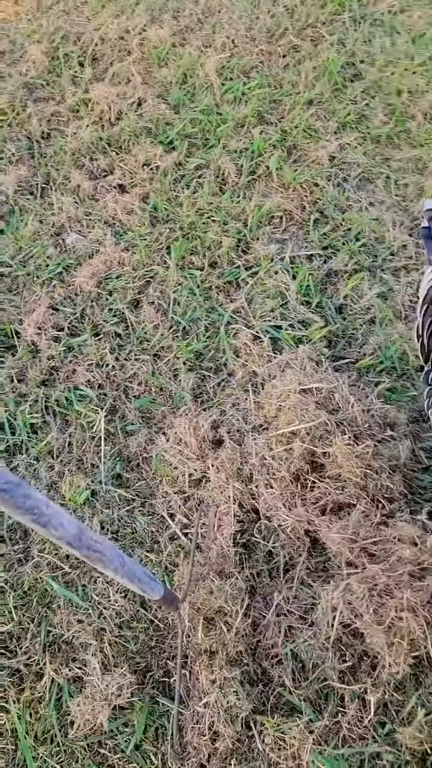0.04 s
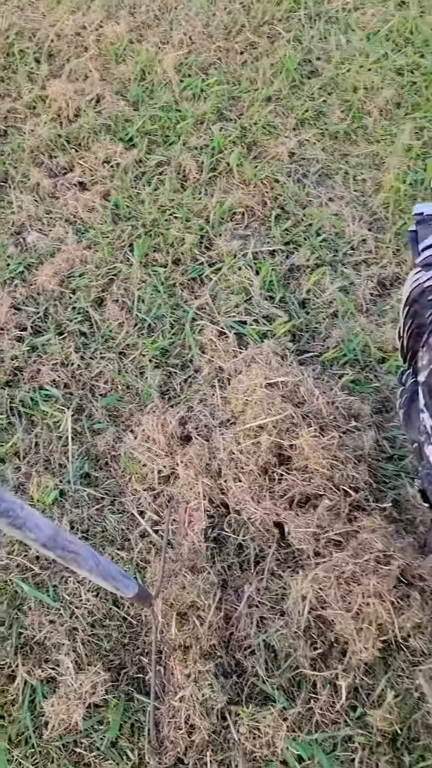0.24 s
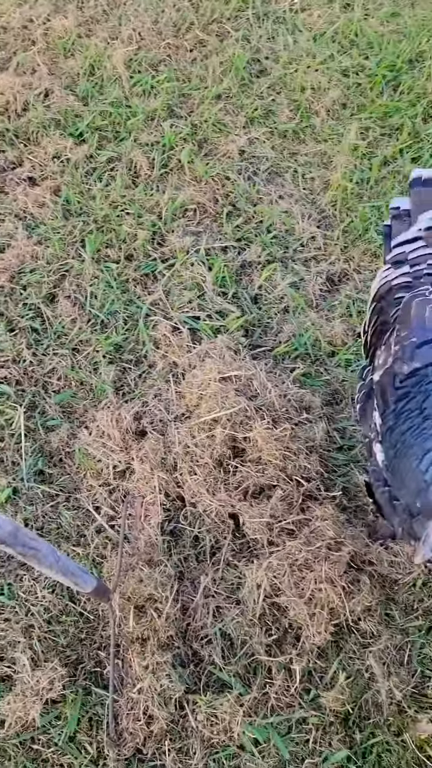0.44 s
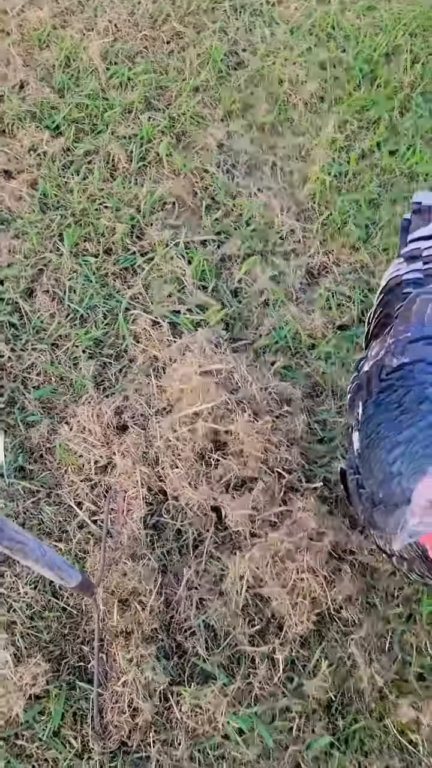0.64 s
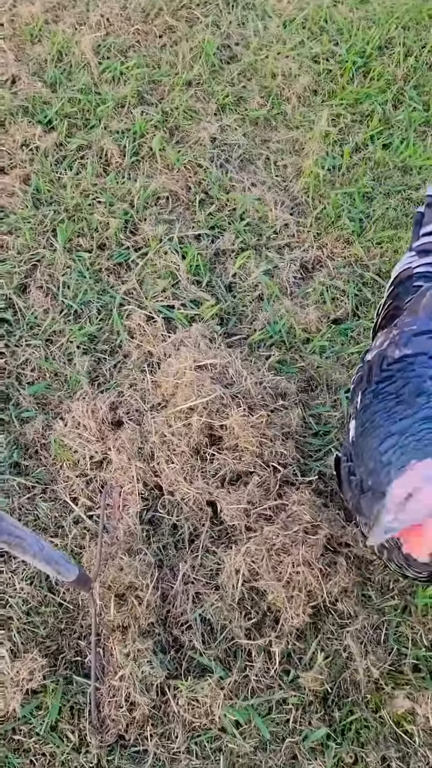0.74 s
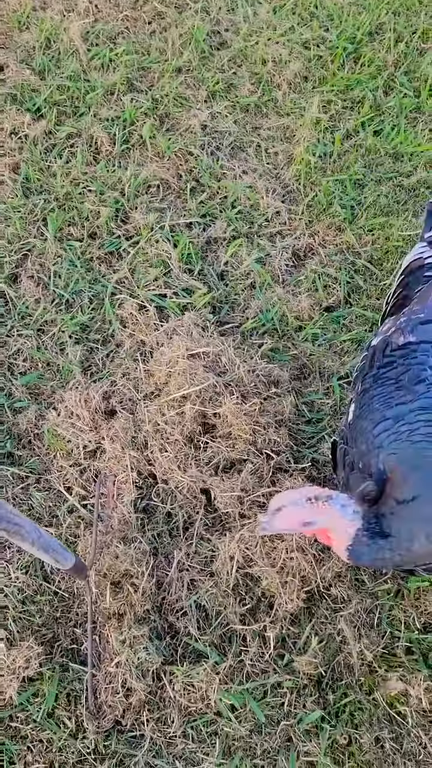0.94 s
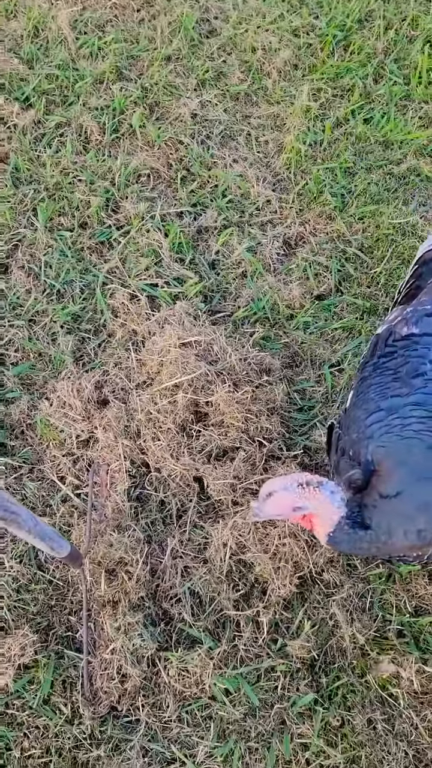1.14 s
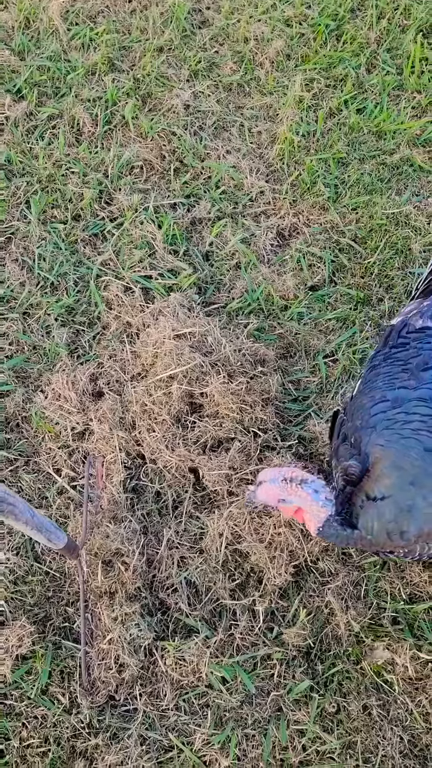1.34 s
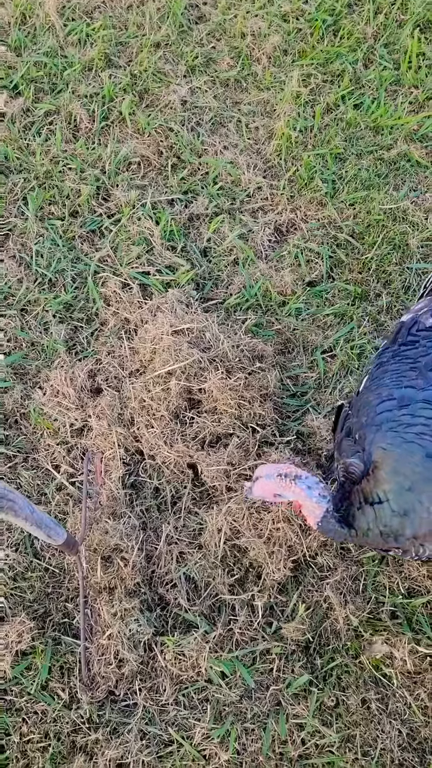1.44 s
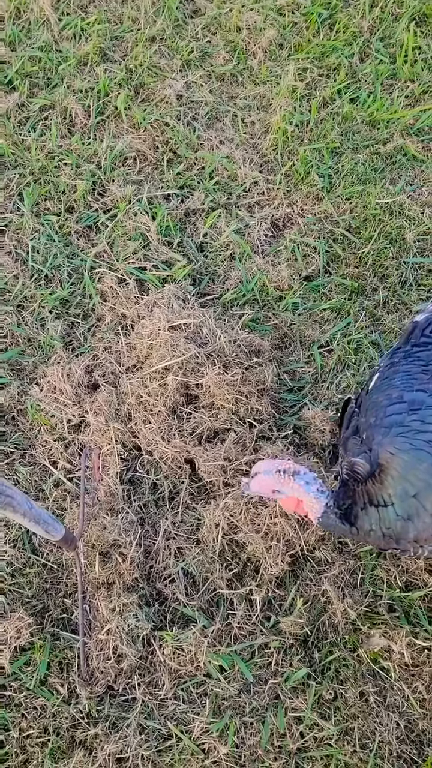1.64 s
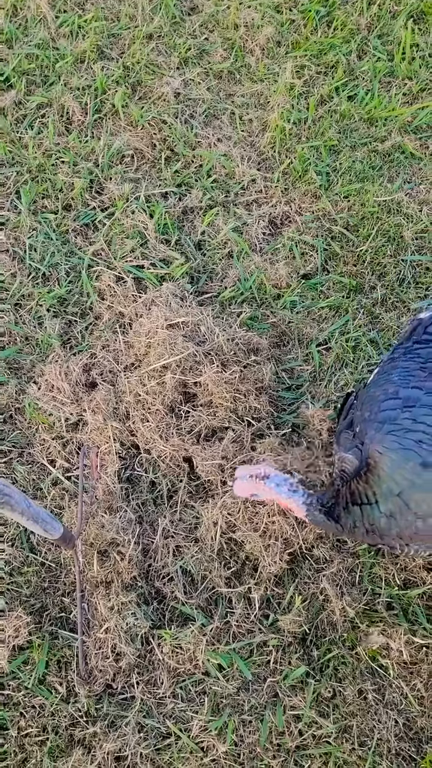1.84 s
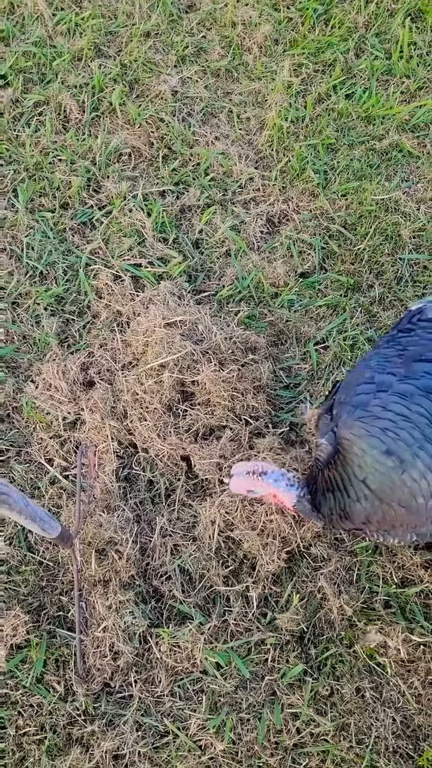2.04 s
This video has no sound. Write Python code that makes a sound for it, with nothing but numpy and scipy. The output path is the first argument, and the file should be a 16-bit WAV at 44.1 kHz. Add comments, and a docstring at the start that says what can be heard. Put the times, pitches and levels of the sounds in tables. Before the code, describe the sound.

A turkey close on the right gives two quick phrases of rising and falling chirps on a lawn. Behind it, dry hay rustles faintly, young birds peep and crickets chirp over a distant hum and low rumble.

```python
"""A lawn: from the start a distant machine hums over a low rumble, a far-off rush and a soft hiss,
while a tool rustles in dry hay. At 0.2 s a turkey, close on the right, gives a quick phrase of rising
and falling chirps. Young birds peep thinly further off, then crickets join with their wing strokes.
The tool rests as the turkey gives a second phrase at 1 s; from 1.6 s the hay stirs again, more softly."""
import sys
import numpy as np
from scipy import signal
from scipy.fft import rfft, irfft, next_fast_len
from scipy.io import wavfile
from scipy.ndimage import map_coordinates

SR = 44100
rng = np.random.default_rng(int(sys.argv[2]) if len(sys.argv) > 2 else 0)


def store_wav(level_fs):
    """Save 16-bit WAV to argv[1]."""
    pcm = np.round(np.clip(np.atleast_2d(level_fs), -1, 1) * 32767)
    wavfile.write(sys.argv[1], SR, pcm.T.astype(np.int16))


N = 92610
T = np.arange(N) / SR


def amp(db):
    """Decibels to gain."""
    return 10 ** (np.asarray(db) / 20)


def unit(x):
    """Scale to rms 1."""
    return x / np.sqrt(np.mean(x ** 2) + 1e-20)


def along(points, hz):
    """Read (frequency, value) points on a log frequency axis."""
    freqs, values = np.transpose(points)
    return np.interp(np.log(hz + 1), np.log(freqs + 1), values)


def curves(rows):
    """One envelope for each column after the time."""
    times, *columns = np.transpose(rows)
    return [np.interp(T, times, column) for column in columns]


def wobble(rate):
    """Smooth random modulation, rate knots a second."""
    return map_coordinates(rng.standard_normal(int(N * rate / SR) + 4), [T * rate])


def gate(start, end, edge_s):
    """Fade in after start and out before end."""
    return np.sin(np.pi / 2 * np.clip(np.minimum(T - start, end - T) / edge_s, 0, 1))


def turns(hz):
    """Running phase of a pitch curve, in radians."""
    return 2 * np.pi * np.cumsum(hz) / SR


def pan(db):
    """Stereo gains for a left-minus-right level difference."""
    return amp(np.array([[db], [-db]]) / 2)


def filtered(x, response):
    """Shape x with a frequency response."""
    size = next_fast_len(N + SR // 2)
    return irfft(rfft(x, size) * response(np.fft.rfftfreq(size, 1 / SR)), size)[..., :N]


def noise(spectrum, alike=0, lead_ms=0):
    """Coloured stereo noise whose shared part reaches the left side first."""
    lead_s = np.array([[lead_ms], [-lead_ms]]) * 1e-3
    common = filtered(rng.standard_normal(N), lambda f: np.exp(1j * np.pi * f * lead_s))
    pair = np.sqrt(alike) * common + np.sqrt(1 - alike) * rng.standard_normal((2, N))
    return unit(filtered(pair, lambda f: amp(along(spectrum, f))))


def yard(x, wet_db):
    """Faint scattered echoes of the open yard."""
    t60_s, build_s = 0.64, 0.0099
    t = T[:SR // 2]
    tail = rng.standard_normal((2, len(t))) * amp(-60 * t / t60_s) * (1 - np.exp(-t / build_s))
    tail /= np.linalg.norm(tail[0])
    return amp(wet_db) * signal.fftconvolve(x.mean(0)[None], tail, axes=1)[:, :N]


def far_rush():
    """A steady far-off rush, louder on the right, and a soft hiss to the left."""
    # Tone colours (frequency [Hz], level [dB])
    rush_colour = [(100, -11.5), (250, -14.5), (420, -7.5), (560, -1.5), (750, 1), (1000, -1), (1350, -6),
                   (1800, -19), (2500, -27), (4000, -40)]
    hiss_colour = [(1500, -2.5), (3000, 5.5), (4500, -9), (7000, -2.5), (11000, -1.5), (15000, -4)]
    # Envelope of the rush (time [s], level [dB])
    rush_level = [(0, -41), (.5, -41.5), (1, -42), (1.5, -42), (1.8, -40.5), (2.1, -42)]
    rush_db, = curves(rush_level)
    rush = amp(rush_db + 0.15 * wobble(14.3)) * noise(rush_colour, alike=0.7, lead_ms=0.48)
    hiss = amp(-66) * noise(hiss_colour)
    return pan(-3.5) * rush + pan(5.5) * hiss


def low_rumble():
    """A bed of deep noise, nearly the same on both sides."""
    # Tone colour (frequency [Hz], level [dB])
    colour = [(20, -46), (35, -12.5), (50, -0.5), (62, -2), (75, -5), (105, -12), (160, -22), (300, -34),
              (600, -47)]
    return pan(-0.58) * amp(-52) * noise(colour, alike=.99, lead_ms=0.494)


def machine():
    """A far machine: a wavering hum that ebbs away, over a low drone of wandering pitch."""
    # Tones of the hum (pitch [Hz], level [dB])
    tones = [(194, -70), (349, -55), (533, -56), (566, -51)]
    # Their shared envelope (time [s], gain [dB])
    hum_level = [(0, 1.5), (.24, 0.5), (.36, -10.5), (.5, -2), (.94, -2), (1.05, -10.5), (1.35, -8),
                 (1.6, -17), (2.1, -16)]
    waver_db, left_lead_s = 2, 0.26e-3
    hum_db, = curves(hum_level)
    hum = np.zeros((2, N))
    for hz, db in tones:
        phase = turns(hz * (1 + 0.0037 * wobble(11.5)))
        lead = 2 * np.pi * hz * left_lead_s
        hum += amp(db + hum_db + waver_db * wobble(9.42)) * np.sin([phase + lead, phase])
    drone_hz = 60.55 * (1 + 0.066 * wobble(14))
    drone = amp(-53.5 + 0.69 * wobble(10.8)) * np.sin(turns(drone_hz))
    return np.sqrt(2) * (pan(-3.5) * hum + pan(-0.58) * drone)


def crickets():
    """Each chirp is a short train of wing strokes on one high note."""
    # Chirps (start [s], length [s], pitch [Hz], level [dB])
    chirps = [(0.564, 0.09, 6800, -64.5), (0.89, 0.093, 6800, -66), (1.249, 0.08, 6800, -68),
              (1.59, 0.098, 6800, -65), (1.718, .11, 6300, -68), (1.966, 0.1, 6800, -69.5),
              (0.852, .08, 8100, -71), (1.146, 0.094, 8100, -71), (1.472, .08, 8100, -71),
              (1.797, .08, 8100, -74.5), (1.037, 0.089, 9500, -72), (1.379, .08, 9500, -71),
              (1.657, 0.083, 9500, -70), (2.003, 0.057, 9500, -71)]
    strokes_per_s, pitch_scatter = 67.8, .025
    out = np.zeros((2, N))
    for start, length, hz, db in chirps:
        strokes = np.sin(np.pi * strokes_per_s * (T - start)) ** 2 * gate(start, start + length, 0.0088)
        for side in out:
            side += 2 * amp(db) * strokes * np.sin(turns(hz * (1 + pitch_scatter * wobble(900))))
    return out


def hay():
    """Dry hay rustles under the tool; a few stalks snap, each a sharp crack with faint splintering."""
    # Envelope of the rustle (time [s], level [dB])
    rustle_level = [(0, -54), (.1, -57.5), (.3, -55.5), (.62, -57.5), (.68, -61), (.92, -66), (1.05, -72),
                    (1.55, -73), (1.68, -63.5), (1.8, -64), (1.9, -63.5), (2.1, -68)]
    # Its tone colour (frequency [Hz], level [dB])
    rustle_colour = [(1500, -10), (3000, 10), (5000, 2.5), (7000, 7), (11000, 2.5), (14500, 9),
                     (16000, 2.5)]
    # Snapping stalks (time [s], level [dB], band centre [Hz], band width [octaves])
    snaps = [(.3121, -10, 14000, .21), (.647, -35, 8000, .6), (1.722, -30, 7000, .7)]
    splinter_db, splinter_t60_s = -15, .008
    level_db, = curves(rustle_level)
    out = amp(level_db + 1.35 * wobble(250) + 0.71 * wobble(27.2)) * noise(rustle_colour)
    for start, db, hz, octaves in snaps:
        decay = amp(splinter_db - 60 * np.abs(T - start) / splinter_t60_s) * (T >= start)
        burst = decay * rng.standard_normal((2, N))
        burst[:, round(start * SR)] = 1  # the crack
        out += amp(db) * filtered(burst, lambda f: np.exp(-.5 * (np.log2((f + 1) / hz) / octaves) ** 2))
    return out


def young_birds():
    """Thin whistles that scoop up, then sag in pitch and grow ragged as they fade or swell."""
    # Peeps (start [s], length [s], top pitch [Hz], fall [Hz], level [dB], fade [dB],
    # left minus right [dB])
    peeps = [(0.331, 0.21, 3490, 184, -66, -6, 1), (0.494, .23, 3313, 240, -62.5, 11.5, -16.5),
             (1.009, 0.088, 3410, 30, -68.5, -9.5, -7), (1.103, 0.036, 3400, 56, -62.5, 5, -9),
             (1.174, .045, 3253, 78, -61.5, 0.5, -3), (1.268, 0.27, 3280, 360, -73, 1, 6),
             (1.481, 0.39, 3393, 290, -50.5, 16.5, 5.5), (1.774, 0.21, 3434, 250, -67.5, -2.5, 1),
             (1.793, 0.12, 3197, 390, -62.5, -1, 15.5), (1.836, .13, 3110, 300, -66.5, 0.5, 17),
             (1.967, .18, 3304, 330, -72, -8, 17.5)]
    scoop_hz, scoop_s, sag_curve = 150, 0.0258, 1.15
    flicker_db, jitter, fray_s = 2.2, 0.003, .13
    out = np.zeros((2, N))
    for start, length, top_hz, fall_hz, db, fade_db, side_db in peeps:
        t = np.clip(T - start, 0, length)
        hz = top_hz - fall_hz * (t / length) ** sag_curve - scoop_hz * np.exp(-t / scoop_s)
        level = amp(db - fade_db * t / length + flicker_db * wobble(44.78))
        level *= gate(start, start + length, edge_s=0.26 * length)
        hz *= 1 + jitter * (1 + t / fray_s) * wobble(120)
        out += pan(side_db) * np.sqrt(2) * level * np.sin(turns(hz))
    return out + yard(out, wet_db=-6)


def turkey():
    """Each chirp is a gliding tone with hoarse overtones; the opening yelp starts rough and bright."""
    # Chirp contours (time [s], pitch [Hz], level [dB])
    yelp = [(.217, 500, -45), (.222, 580, -24.5), (.229, 685, -20), (.234, 712, -17.3), (.242, 750, -17.8),
            (.247, 770, -29)]
    rise = [(.242, 950, -34), (.246, 965, -20), (.263, 968, -18.5), (.275, 1080, -28), (.281, 1125, -28),
            (.289, 1050, -29), (.298, 1270, -33), (.303, 1350, -48)]
    arch = [(.328, 860, -42), (.335, 838, -23), (.347, 840, -20), (.358, 900, -26), (.367, 875, -23),
            (.377, 660, -30), (.383, 540, -42)]
    held = [(1.019, 740, -38), (1.022, 790, -27), (1.027, 940, -32), (1.033, 978, -23), (1.053, 976, -20.5),
            (1.074, 1004, -30.5), (1.085, 988, -25), (1.093, 950, -30), (1.095, 1360, -39),
            (1.1, 1420, -37), (1.104, 1450, -48)]
    pip = [(1.127, 1000, -42), (1.133, 940, -26), (1.141, 920, -25), (1.149, 985, -27), (1.153, 1300, -43),
           (1.159, 1470, -41)]
    drop = [(1.166, 1399, -48), (1.173, 1034, -37), (1.179, 835, -22.5), (1.183, 740, -29),
            (1.186, 560, -31), (1.191, 520, -30), (1.195, 467, -48)]
    # Voicing (contour, 2nd harmonic [dB], 3rd harmonic [dB], onset rasp [dB], left gain [dB],
    # roughness [0-1])
    chirps = [(yelp, -20.5, -38.5, 20.5, 0, 0.15), (rise, -22.5, -44, 0, 0, 0.04),
              (arch, -25, -40, 0, -10, 0.024), (held, -16.5, -30.5, 0, -11.5, 0.023),
              (pip, -20.5, -46, 0, -14, 0.033), (drop, -25, -52, 0, -5, .06)]
    # Colour of the throat (frequency [Hz], overtone gain [dB])
    throat = [(500, 32), (1400, -1), (1900, -7.5), (2200, -6), (2480, 6), (2620, 8), (2750, -10),
              (3200, -16), (5000, -10)]
    # Colour of the left side (frequency [Hz], left minus right [dB])
    left_colour = [(600, -13), (750, -6), (970, -4.5), (1150, 1.5), (1400, 1.5), (2000, -4), (3000, 15)]
    # Phase of the left side (frequency [Hz], lead [rad])
    left_phase = [(600, 0.71), (750, 1.05), (860, 1.3), (970, 2), (1100, 1.96), (1350, 1.3), (2000, 1.44),
                  (3000, 1.9)]
    jitter, flutter_hz = 0.0101, 343.8
    rasp_decay_s, rasp_hz = 0.016, 474
    hoarse_rad, hoarse_hz = .22, 600  # phase scatter of the overtones
    out = np.zeros((2, N))
    for contour, second_db, third_db, rasp_db, left_db, rough in chirps:
        hz, db = curves(contour)
        start, end = contour[0][0], contour[-1][0]
        hz *= 1 + jitter * wobble(flutter_hz)
        level = np.sqrt(2) * amp(db) * gate(start, end, 0.0014) * (1 + rough * wobble(flutter_hz))
        bright_db = rasp_db * np.exp(-np.abs(T - start) / rasp_decay_s) * (1 + 0.11 * wobble(rasp_hz))
        phase = turns(hz)
        for k, harmonic_db in enumerate([0, second_db, third_db], 1):
            colour_db = 0 if k == 1 else harmonic_db + (k - 1) * bright_db + along(throat, k * hz)
            partial = level * amp(colour_db)
            angle = k * phase + (k - 1) * hoarse_rad * wobble(hoarse_hz)
            left_gain = amp(left_db + along(left_colour, k * hz))
            out[0] += partial * left_gain * np.sin(angle + along(left_phase, k * hz))
            out[1] += partial * np.sin(angle)
    return out + yard(out, wet_db=-14.5)


def scene():
    """Everything on the lawn together."""
    return turkey() + young_birds() + crickets() + hay() + machine() + low_rumble() + far_rush()


def record(dry):
    """The microphone keeps nothing above its band limit."""
    return filtered(dry, lambda hz: hz < 15800)


dry = scene()
out = record(dry)
store_wav(out)
```